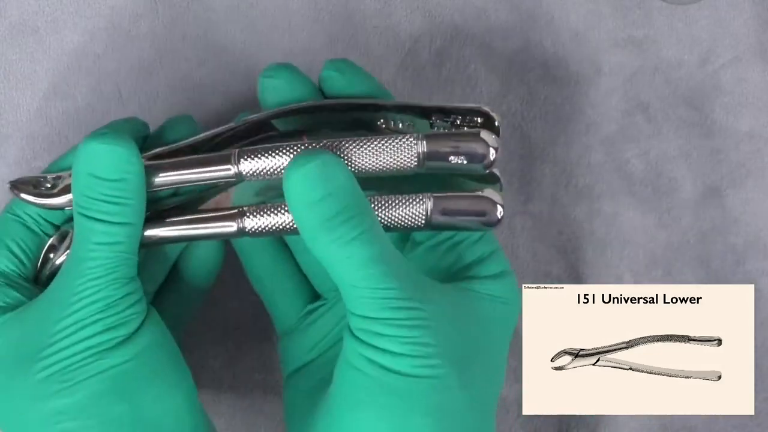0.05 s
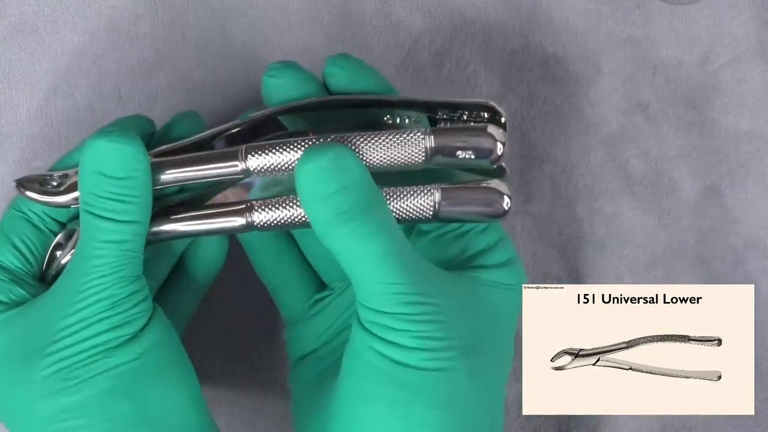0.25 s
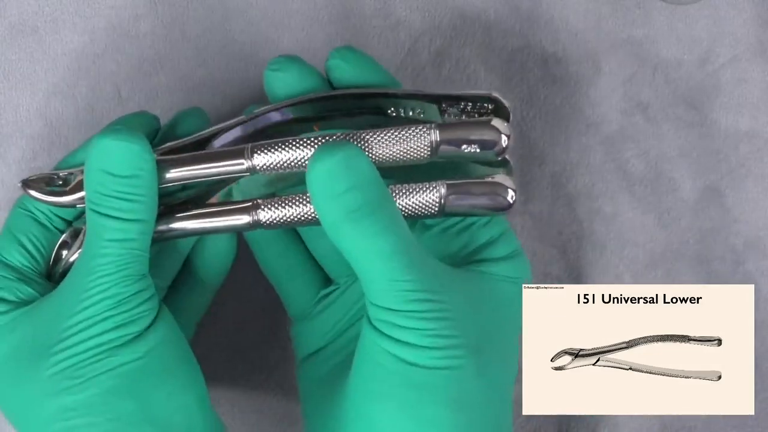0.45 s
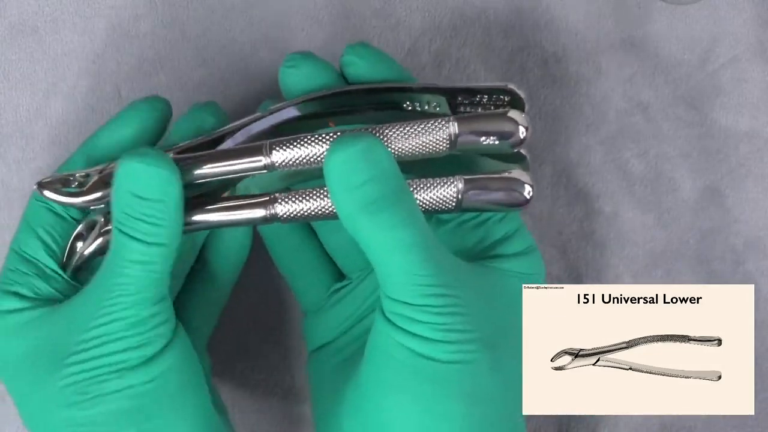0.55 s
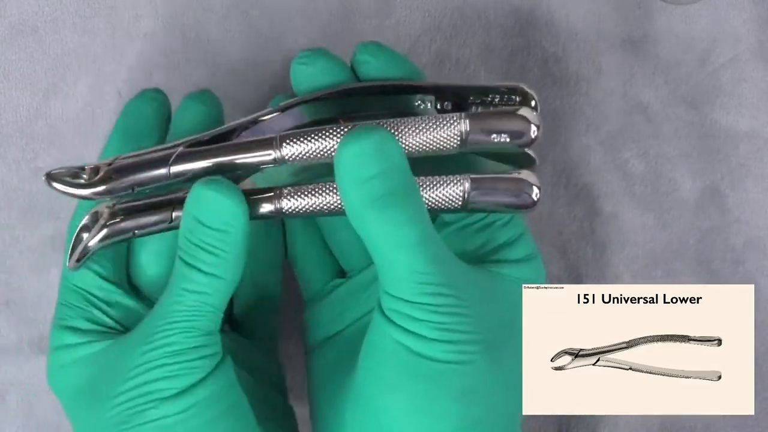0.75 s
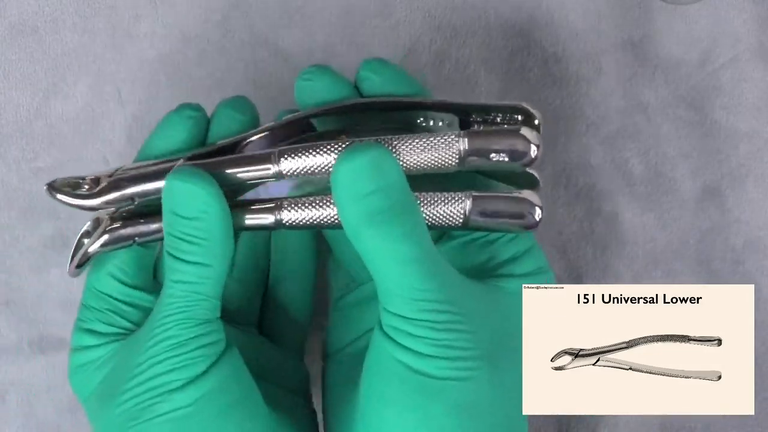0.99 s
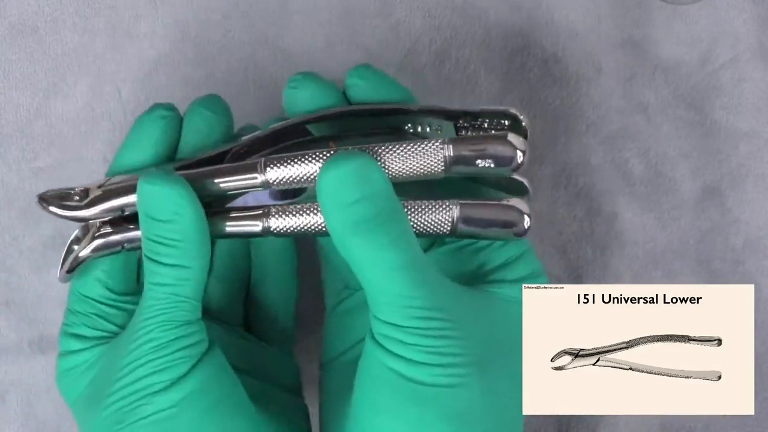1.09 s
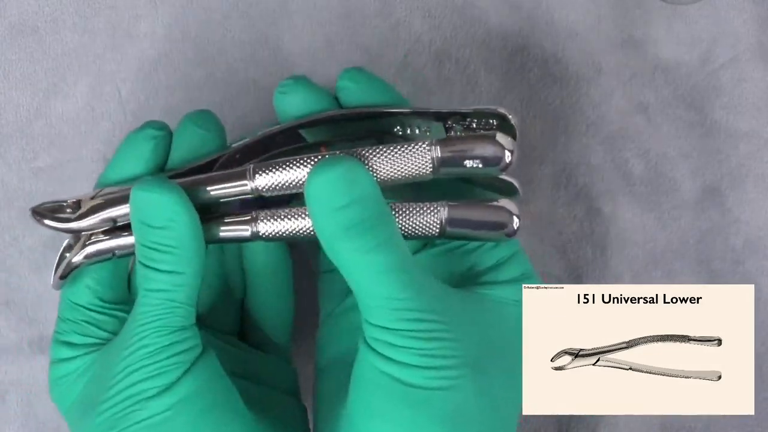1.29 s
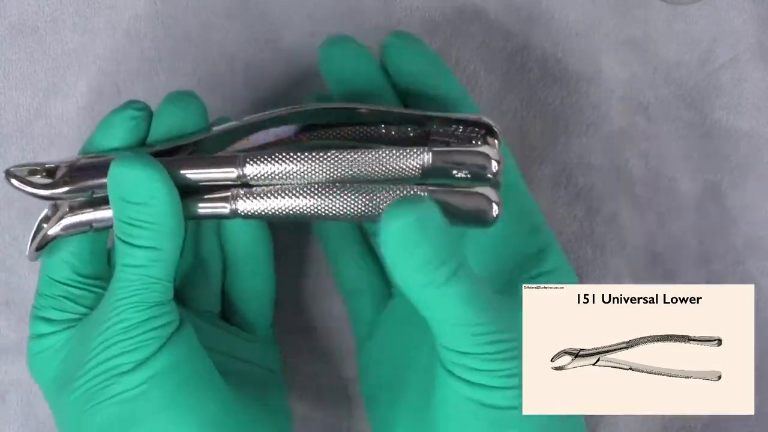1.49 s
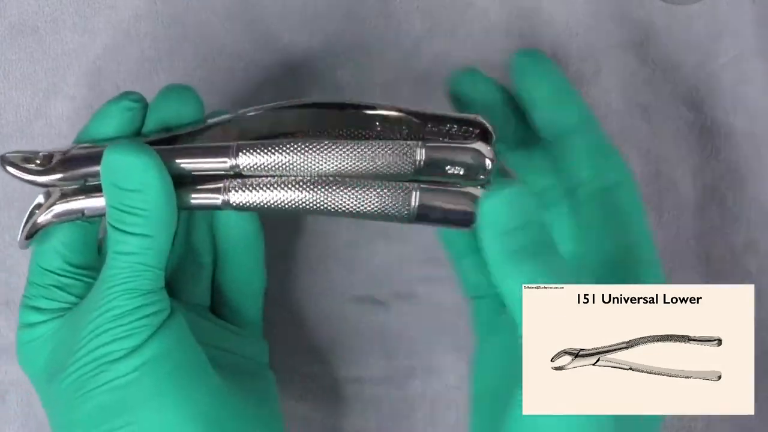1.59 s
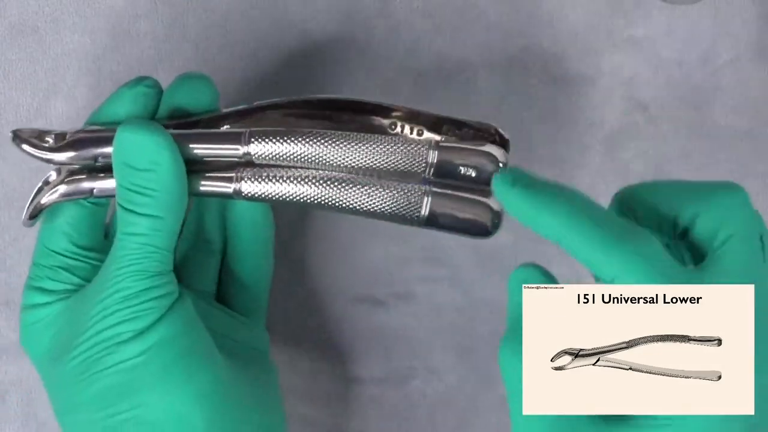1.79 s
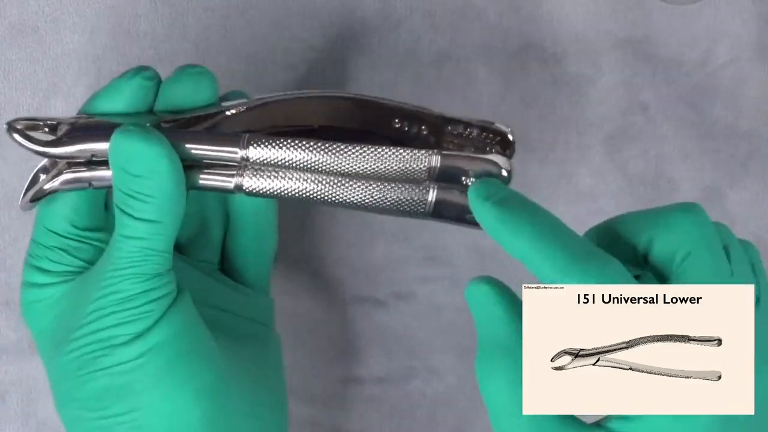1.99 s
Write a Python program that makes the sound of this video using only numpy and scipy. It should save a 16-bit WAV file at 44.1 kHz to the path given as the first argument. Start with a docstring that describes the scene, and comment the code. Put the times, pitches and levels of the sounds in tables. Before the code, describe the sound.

Steel forceps clack together twice in gloved hands, then tick and chatter lightly, close up indoors

```python
"""Steel forceps in gloved hands

Two pairs of steel forceps are turned close to the microphone in a quiet ventilated room.
The handles clack twice and rattle out, tick lightly, then chatter under a finger:
decaying modes with short noisy ticks and cracks.
The gloves rustle in swells of dense grains and snap in short bursts of coloured noise.
Below lie air rumble, a fan band and a thin hiss, all shaped noise, and a mains hum, a steady sine."""
import sys
import numpy as np
from scipy import signal
from scipy.fft import rfft, irfft, next_fast_len
from scipy.io import wavfile

SR = 44100
rng = np.random.default_rng(int(sys.argv[2]) if len(sys.argv) > 2 else 0)


def ratio(d):
    """dB to gain"""
    e = np.asarray(d, float) / 20
    return 10 ** e


def int16_out(signal):
    """Quantize to a 16-bit WAV file."""
    q = np.round(np.clip(np.atleast_2d(signal).T, -1, 1) * 32767)
    wavfile.write(sys.argv[1], SR, q.astype(np.int16))


N = 90228  # length [samples]


def rms_one(x):
    """Scale to rms 1."""
    return x / np.sqrt(np.mean(x ** 2) + 1e-20)


def ring(clicks, hz, t60):
    """A two-pole resonator: a unit click sets a decaying sine of height 1 ringing."""
    r = ratio(-60 / (t60 * SR))
    w = 2 * np.pi * hz / SR
    return signal.lfilter([0, np.sin(w)], [1, -2 * r * np.cos(w), r * r], clicks + 1e-18)


def resonance(x, hz, width_hz):
    """A broad band-pass with gain 1 on top."""
    r = np.exp(-np.pi * width_hz / SR)
    poles = [1, -2 * r * np.cos(2 * np.pi * hz / SR), r * r]
    return signal.lfilter([(1 - r * r) / 2, 0, (r * r - 1) / 2], poles, x)


def grains(per_s, spread_db):
    """Random clicks of uneven size and sign."""
    rise_db = spread_db * np.minimum(rng.exponential(1, N), 4.0)
    sizes = ratio(rise_db) * rng.choice([-1, 1], N)
    return sizes * (rng.random(N) < per_s / SR)


def fading(start_s, t60):
    """Zero before the start, then an exponential decay from 1."""
    t = np.arange(N) / SR - start_s
    return (t >= 0) * ratio(-60 * np.maximum(t, 0) / t60)


# spectrum of the room's air, fan band and hiss: (frequency [Hz], relative density [dB])
AIR_SPECTRUM = [(5, -42.5), (11, -41), (22, -49.5), (40, -56), (64, -69), (80, -53.5), (102, -67.5),
                (180, -72), (240, -79.5), (350, -84.5), (480, -79), (540, -76), (620, -84.5), (900, -88),
                (1150, -87), (1550, -97), (1900, -97), (2350, -102), (4100, -106), (4700, -102),
                (5600, -105), (8000, -107), (9000, -96), (10000, -106), (16000, -110)]
# swell of the lowest rumble in the room: (time [s], level [dB])
RUMBLE_SWELL = [(0.0, -43), (0.04, -44.5), (0.68, -44.5), (0.81, -35), (1.06, -45.5), (1.32, -40.5),
                (1.36, -29.5), (1.6, -48.5), (1.74, -34.5), (1.8, -47.5), (1.91, -42), (2.05, -50.5)]
AIR_DB = -40.5  # level of the whole air spectrum, before its lowest part is split off
RUMBLE_TOP_HZ = 29.2
HUM_HZ, HUM_DB = 119.76, -61


def room_tone():
    """Coloured noise whose lowest part swells and sinks, with a mains hum."""
    size = next_fast_len(N)
    hz = np.maximum(np.arange(size // 2 + 1) * SR / size, 1)
    point_hz, point_db = np.transpose(AIR_SPECTRUM)
    colour = ratio(np.interp(np.log(hz), np.log(point_hz), point_db))
    spectrum = rfft(rng.standard_normal(size)) * colour
    low = 1 / (1 + (hz / RUMBLE_TOP_HZ) ** 6)
    scale = ratio(AIR_DB) / np.std(irfft(spectrum, size))
    air = scale * irfft(spectrum * (1 - low), size)[:N]
    t = np.arange(N) / SR
    s, db = np.transpose(RUMBLE_SWELL)
    rumble = ratio(np.interp(t, s, db)) * rms_one(irfft(spectrum * low, size)[:N])
    hum = ratio(HUM_DB) * np.sqrt(2) * np.sin(2 * np.pi * (HUM_HZ * t + rng.random()))
    return rumble + air + hum


ROOM_T60_S, ROOM_DB = 0.22, -13.5


def room(x):
    """The room's echo as a dying noise tail, starting 2 ms late."""
    tail = rng.standard_normal(N) * fading(0.002, ROOM_T60_S)
    tail = tail / np.sqrt(np.sum(tail ** 2))
    return ratio(ROOM_DB) * signal.fftconvolve(x, tail)[:N]


# glove slides on steel, close by:
# (peak time [s], rise constant [s], fall constant [s], level at the peak [dB], centre [Hz])
GLOVE_SLIDES = [(0.0, .1, 0.29, -71.5, 4900), (.55, 0.06, 0.14, -75, 4400),
                (0.781, .01, 0.015, -62.5, 7600), (1.245, 0.011, 0.015, -57, 6500),
                (1.6, 0.14, 0.21, -68, 4600), (1.95, 0.024, 0.12, -63.5, 3500), (0, 0.02, .015, -65, 3600),
                (1.9, .02, 0.026, -70, 4800), (.975, .004, 0.0046, -77, 9000)]
SLIDE_GRAINS_PER_S, SLIDE_SPREAD_DB, SLIDE_Q = 15000, 5.5, 0.46


def glove_slides():
    """Rubber rubbing on steel: swells of dense grains through a broad band-pass."""
    t, out = np.arange(N) / SR, np.zeros(N)
    for s, rise_s, fall_s, db, hz in GLOVE_SLIDES:
        rub = resonance(grains(SLIDE_GRAINS_PER_S, SLIDE_SPREAD_DB), hz, hz / SLIDE_Q)
        swell = np.exp(-np.abs(t - s) / np.where(t < s, rise_s, fall_s))
        out += ratio(db) * swell * rms_one(rub)
    return out


# glove rubber snapping loose, close by:
# (time [s], level at the start [dB], centre [Hz], width of each of two band-passes [Hz], t60 [s])
GLOVE_SNAPS = [(0.7804, -50, 12300, 2480, .01), (1.234, -60.5, 3800, 1200, 0.0087),
               (1.2443, -46.5, 4450, 1300, 0.016), (1.257, -50.5, 4530, 1300, 0.017),
               (1.27, -67, 5000, 1490, .05), (1.885, -54.5, 9800, 9000, 0.0042)]


def glove_snaps():
    """Rubber letting go: dying bursts of noise, band-passed twice."""
    out, white = np.zeros(N), rng.standard_normal(N)
    for s, db, hz, width_hz, t60 in GLOVE_SNAPS:
        burst = resonance(resonance(white, hz, width_hz), hz, width_hz)
        out += ratio(db) * fading(s, t60) * rms_one(burst)
    return out


# light touches on the handles, close by: (time [s], level before the ring and tick gains [dB],
# brightness [dB per octave], share of the free ring left by the grip [0-1], scuff decay constant [s])
HANDLE_TOUCHES = [(1.384, -41, 3, 0.7, 0.0033), (1.402, -40, 9, 0.97, 0.0028),
                  (1.466, -66, -12, 0.14, 0.0066), (1.490, -59, 8, .4, 0.0046), (1.567, -72, -4, .3, .004),
                  (1.608, -70, -2, 0.1, 0.0032), (1.735, -61, -2, 0.2, .004),
                  (1.571, -76, -11, 0.8, 0.0066), (1.577, -55, -2, 0.35, 0.0064),
                  (1.625, -49, 6, 0.34, 0.0037), (1.659, -57.5, 0, 0.27, .006),
                  (1.669, -52.5, 8.5, 0.37, 0.0045), (1.685, -56, -3, 0.2, .004),
                  (1.718, -45.5, 6.5, 0.11, 0.0083), (1.806, -59.5, -1, 0.7, 0.0049),
                  (1.930, -51.5, 13, 0.26, 0.0027), (1.933, -54.5, -12.5, 0.42, 0.004),
                  (1.958, -38.5, 2.5, 0.92, .001), (1.962, -48, -5, 0.25, 0.0018),
                  (1.972, -50, 0, 0.7, 0.0038), (2, -44.5, -1, 0.6, .0015),
                  (2.0119, -41.5, 6, 0.66, 0.0011), (2.0247, -42.5, 2, 0.34, 0.00092),
                  (2.035, -51, 11, 0.2, .004)]
# frequencies of the handle modes: one column, (frequency [Hz])
HANDLE_MODES_HZ = [1130, 1830, 2960, 3465, 4033, 4167, 4540, 5045, 5188, 5320, 5485, 5666, 6185, 6480, 7900,
                   8300, 8680, 9310, 11100, 11800, 12600, 14900]
# the same modes in the same order: (relative level [dB], t60 when held freely [s])
HANDLE_MODES = [(-20, 0.37), (-15.5, 0.15), (-5, 0.19), (-14, 0.15), (2.5, 0.071), (-15, 0.049),
                (-9, 0.047), (-5, .07), (2, 0.09), (-7, .03), (-15, 0.1), (-7, 0.058), (-18, 0.095),
                (-8.5, 0.049), (-16, 0.041), (-18, 0.027), (-10.5, 0.084), (-10.5, .05), (-15.5, .03),
                (-15, 0.017), (-18.5, 0.039), (-26, .015)]
PIVOT_HZ = 5000  # brightness tilts the modes around here
SCUFF_SHARE = 0.92  # later contacts against the first one
RING_DB, MODE_SPREAD_DB = -8.5, 1.5  # both also for the hard knocks
TICK_DB, TICK_HZ, TICK_WIDTH_HZ, TICK_T60_S = -18, 5520, 1700, 0.017


def handles():
    """Each touch is a scuff of tiny contacts into grip-damped handle modes, with a gritty tick."""
    out, t = np.zeros(N + SR), np.arange(SR // 4) / SR
    hz = np.array(HANDLE_MODES_HZ)[:, None]
    mode_db, t60 = np.transpose(HANDLE_MODES)[:, :, None]
    signs = (-1) ** np.arange(len(hz))[:, None]
    luck = rng.standard_normal((len(HANDLE_TOUCHES), len(hz), 1))
    noise = rng.standard_normal((len(HANDLE_TOUCHES), SR // 40))
    grit = rng.standard_normal((len(HANDLE_TOUCHES), len(t)))
    for _ in range(2):
        grit = resonance(grit, TICK_HZ, TICK_WIDTH_HZ)
    grit = rms_one(grit)
    scuff_t = t[:noise.shape[1]]
    for (s, db, tilt, grip, scuff_s), own, rough, tick in zip(HANDLE_TOUCHES, luck, noise, grit):
        scuff = rough ** 3 * np.exp(-scuff_t / scuff_s)  # the cube makes the contacts sparse
        scuff = SCUFF_SHARE * scuff / np.sqrt(np.sum(scuff ** 2)) + (scuff_t == 0)
        # how hard the scuff drives each mode, to be evened out
        reach = np.abs(np.exp(2j * np.pi * hz * scuff_t) @ scuff)[:, None]
        level_db = mode_db + RING_DB + tilt * np.log2(hz / PIVOT_HZ) + MODE_SPREAD_DB * own
        level = signs * ratio(level_db) / np.maximum(reach, .5)
        decay = ratio(-60 * t / (t60 * grip))
        modes = np.sum(level * decay * np.sin(2 * np.pi * hz * t), axis=0)
        modes += ratio(TICK_DB + tilt - 60 * t / TICK_T60_S) * tick
        sound = ratio(db) * signal.fftconvolve(modes, scuff)
        start = int(s * SR)
        out[start:start + len(sound)] += sound
    return out[:N]


# one pair knocking hard on the other, close by:
# (time [s], level before the ring and crack gains [dB], brightness [dB per octave])
HARD_CLACKS = [(1.3836, -34, 6.5), (1.392, -49, -8), (1.4017, -36, -1.5), (1.416, -59, 0),
               (1.417, -66, -17.5), (1.425, -46.5, -10), (1.397, -43.5, -3.5), (1.434, -50, 2),
               (1.443, -59, -9)]
# the loose joint rattling after a hard clack: (start [s], level before grain spread [dB], t60 [s])
JOINT_RATTLES = [(1.387, -57.5, 0.091), (1.405, -63, 0.08)]
# frequencies of the dense modes woken by the knocks: one column, (frequency [Hz])
JAW_MODES_HZ = [1150, 1850, 2960, 4480, 5092, 5240, 5370, 5885, 5965, 6075, 6175, 6232, 6318, 6488, 6706,
                7000, 7420, 7610, 7685, 8272, 8740, 9240, 10300, 11200, 12300, 13000, 14300]
# the same modes in the same order: (relative level [dB], t60 [s])
JAW_MODES = [(-18, 0.026), (-21.5, 0.057), (-15, 0.05), (-15, .03), (-7, .06), (-7, .05), (-8, .04),
             (-18, 0.074), (-11, 0.068), (-7, 0.037), (-1.5, 0.065), (-7.5, .1), (-4, 0.075), (-5, 0.091),
             (-10, .08), (-11, 0.027), (-9, 0.036), (-6, 0.035), (-5, 0.039), (-4.5, 0.03), (-12, .05),
             (-13, 0.047), (-9.5, .03), (-14, .03), (-7, 0.032), (-9, 0.027), (-17, .02)]
RATTLE_PER_S, RATTLE_SPREAD_DB, RATTLE_CRACK_DB = 660, 3.5, 5
CRACK_DB, CRACK_T60_S, CRACK_HZ, CRACK_WIDTH_HZ = 0.5, 0.0095, 6800, 4400


def steel():
    """Knocks and their rattle strike the dense modes; every contact also gives a short noisy crack."""
    s, db, tilt = np.transpose(HARD_CLACKS)
    at = (s * SR).astype(int)
    luck = rng.standard_normal((len(s), len(JAW_MODES)))
    rattle_level = sum(ratio(level_db) * fading(start, t60) for start, level_db, t60 in JOINT_RATTLES)
    rattle = grains(RATTLE_PER_S, RATTLE_SPREAD_DB) * rattle_level
    modes = np.zeros(N)
    for k, (hz, (mode_db, t60)) in enumerate(zip(JAW_MODES_HZ, JAW_MODES)):
        clicks = rattle * rng.standard_normal(N)
        knock_db = db + RING_DB + tilt * np.log2(hz / CRACK_HZ) + MODE_SPREAD_DB * luck[:, k]
        clicks[at] += ratio(knock_db) * np.sign(luck[:, -k])  # random sign
        modes += ratio(mode_db) * ring(clicks, hz, t60)
    contact = np.abs(rattle) * ratio(RATTLE_CRACK_DB)
    contact[at] += ratio(db + CRACK_DB)
    dying = signal.lfilter([1], [1, -ratio(-60 / (CRACK_T60_S * SR))], contact + 1e-18)
    crack = rms_one(resonance(rng.standard_normal(N), CRACK_HZ, CRACK_WIDTH_HZ))
    return modes + dying * crack


def scene():
    """Steel and gloves close by, their echo, and the room tone."""
    near = glove_slides() + glove_snaps() + handles() + steel()
    near = near - resonance(near, 2310, 390)  # a hollow in the close sounds: centre, width [Hz]
    return (near + room(near) + room_tone())[None, :]


def low_pass(x):
    """Removes everything above the highest recorded frequency."""
    return signal.sosfilt(signal.butter(12, 16330, fs=SR, output="sos"), x)


def record(dry):
    """The microphone signal loses its top: a steep low-pass, 50 dB down from 16400 Hz."""
    top_cut = signal.cheby2(12, 50, 16400, fs=SR, output="sos")
    mix = signal.sosfilt(top_cut, dry)
    return low_pass(mix)


dry = scene()
out = record(dry)
int16_out(out)
```